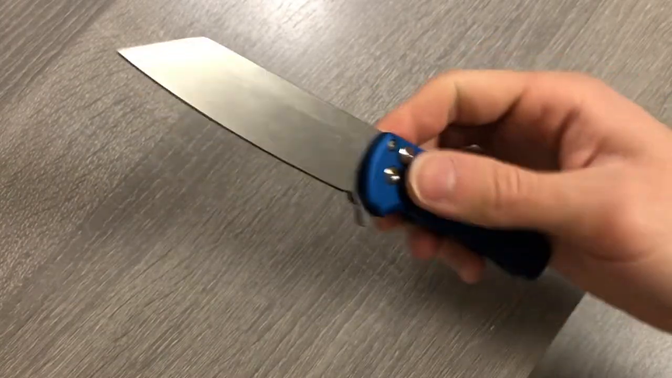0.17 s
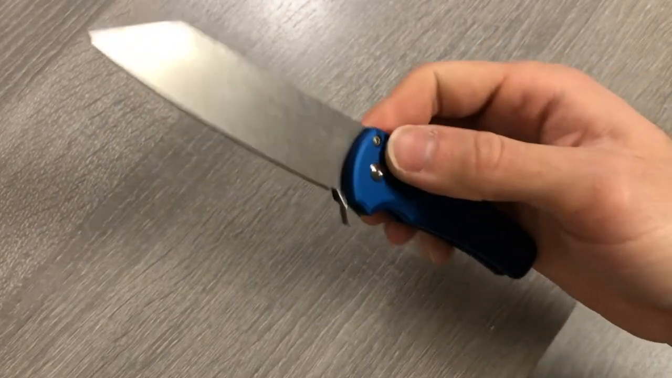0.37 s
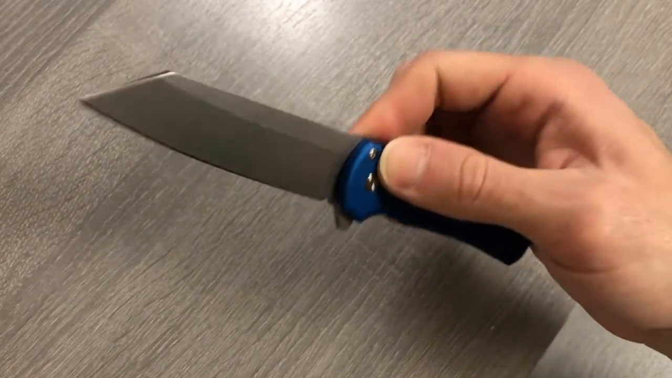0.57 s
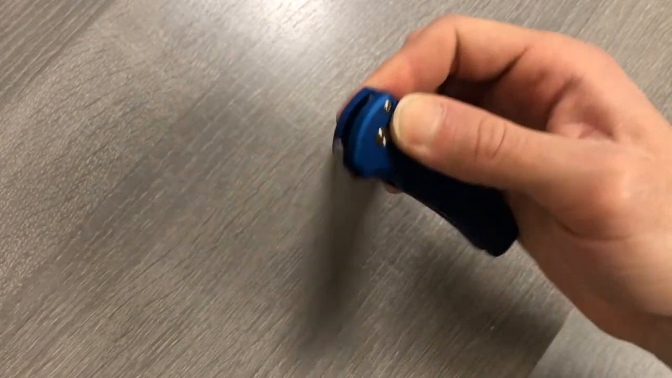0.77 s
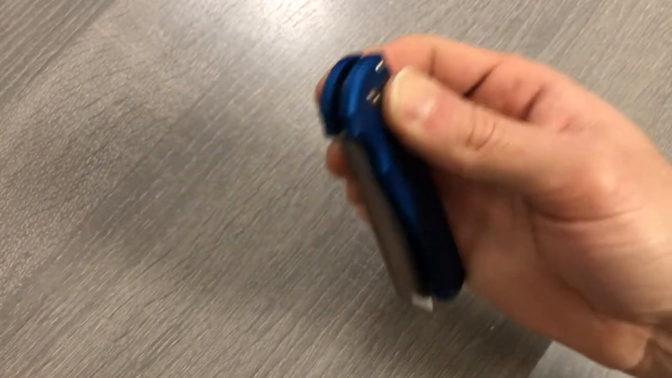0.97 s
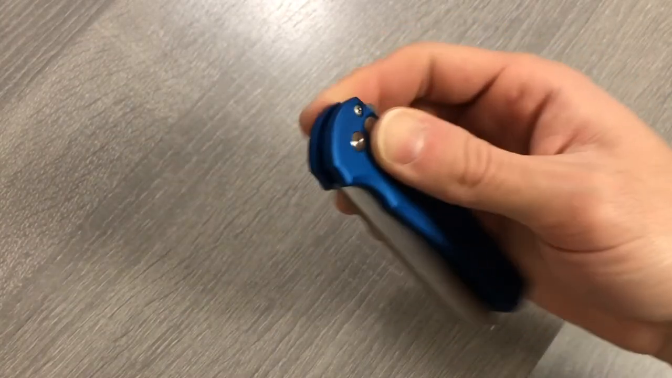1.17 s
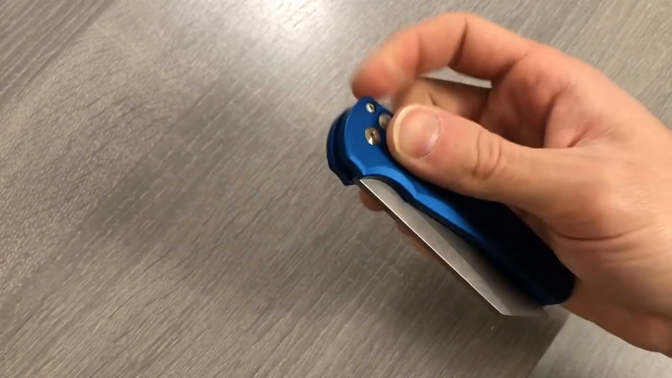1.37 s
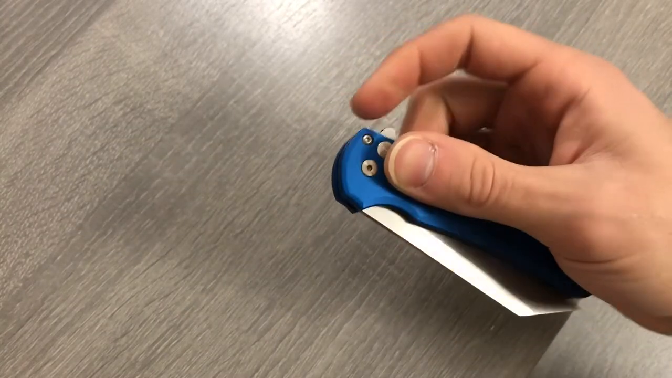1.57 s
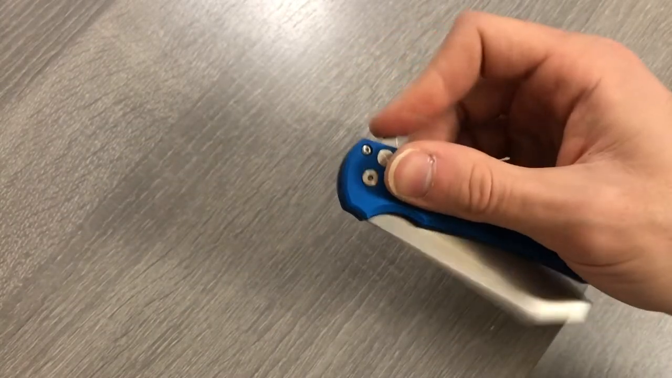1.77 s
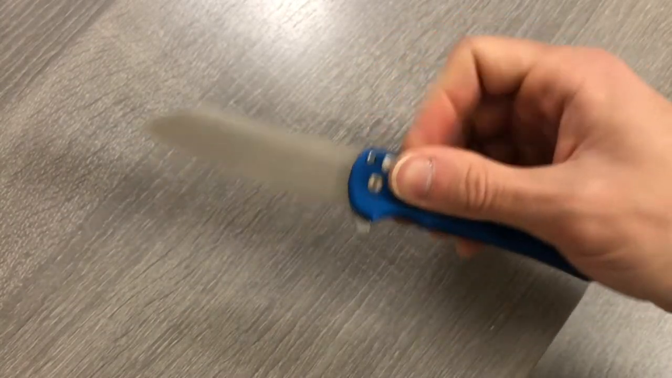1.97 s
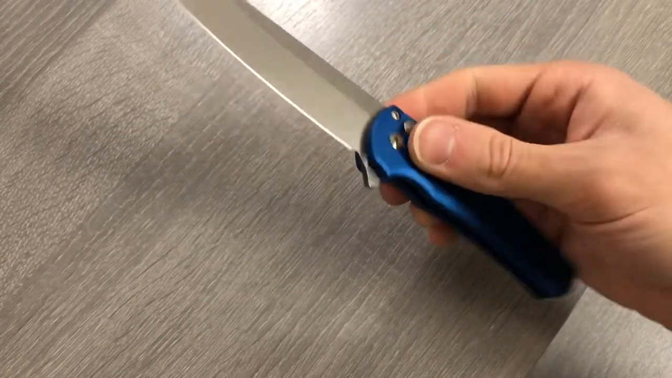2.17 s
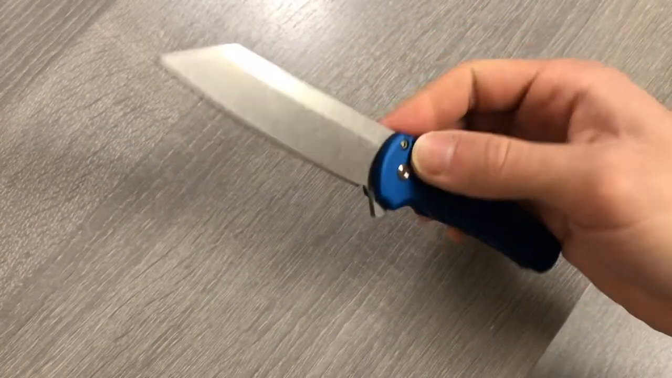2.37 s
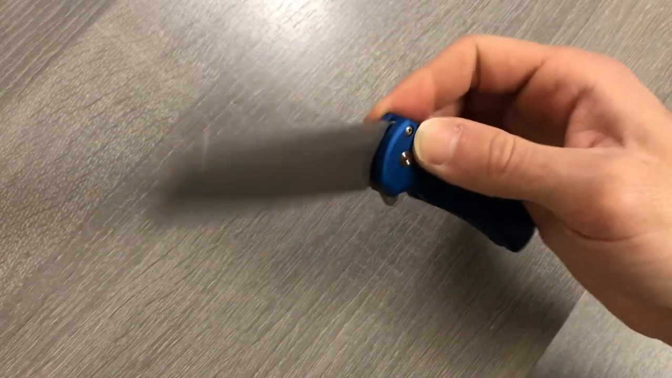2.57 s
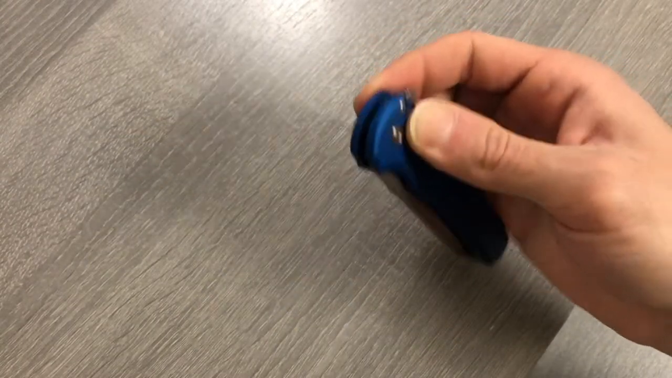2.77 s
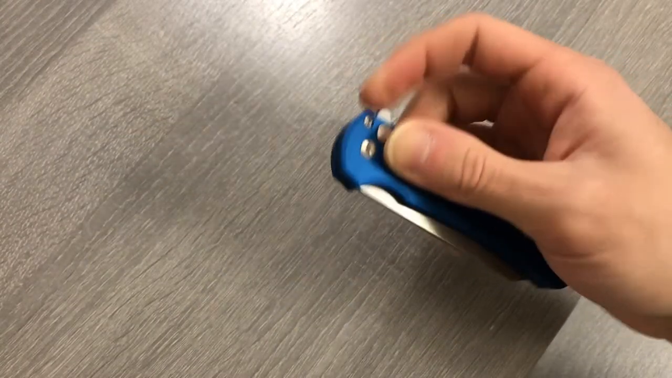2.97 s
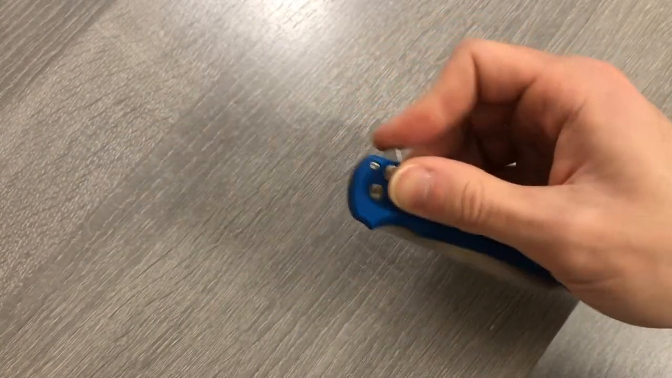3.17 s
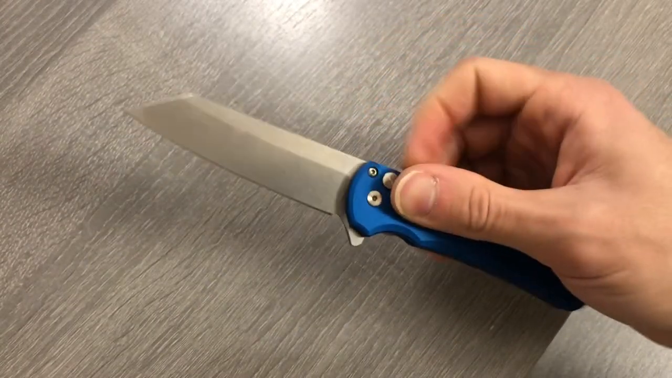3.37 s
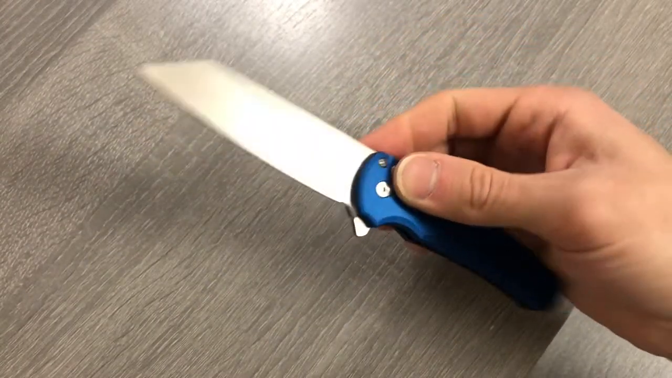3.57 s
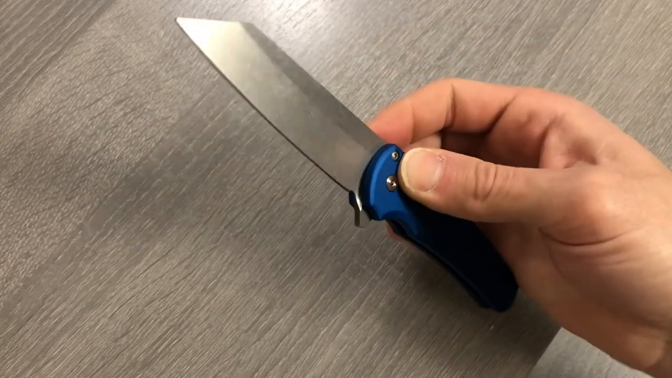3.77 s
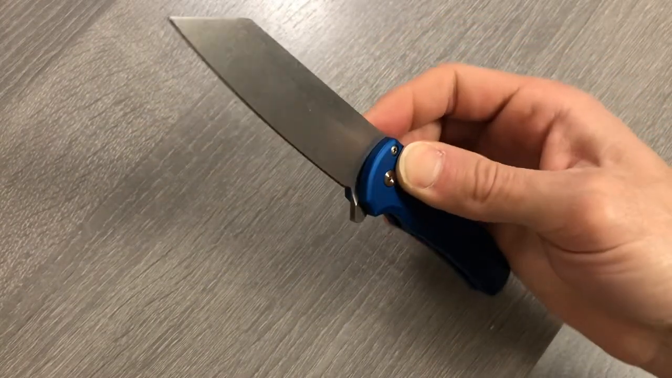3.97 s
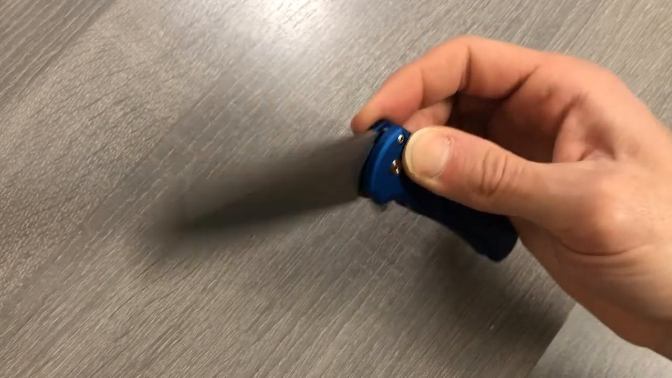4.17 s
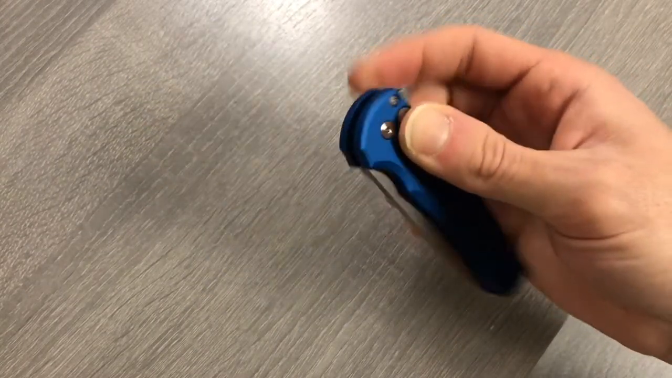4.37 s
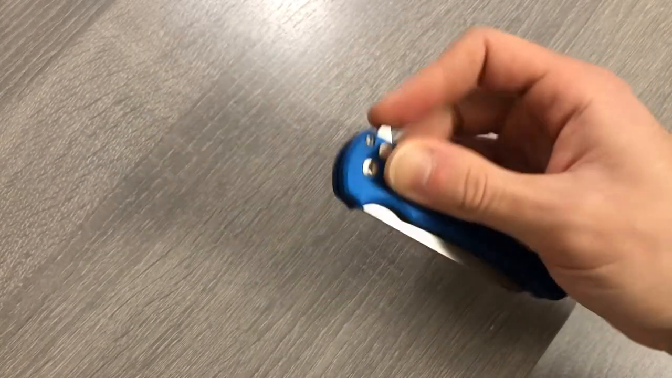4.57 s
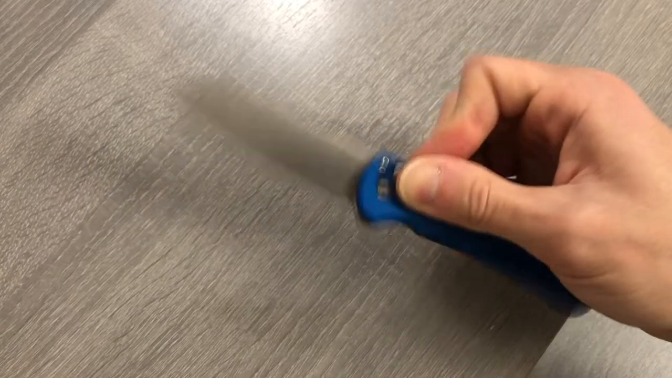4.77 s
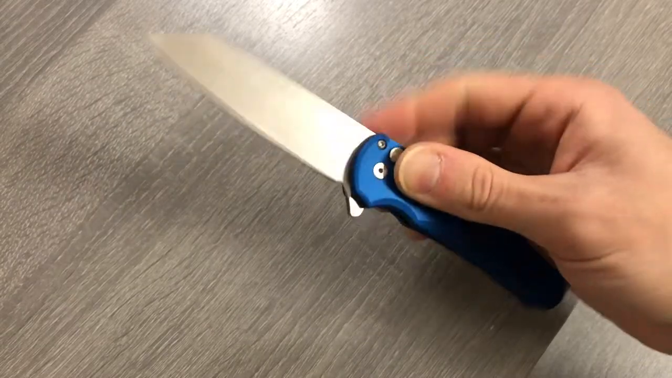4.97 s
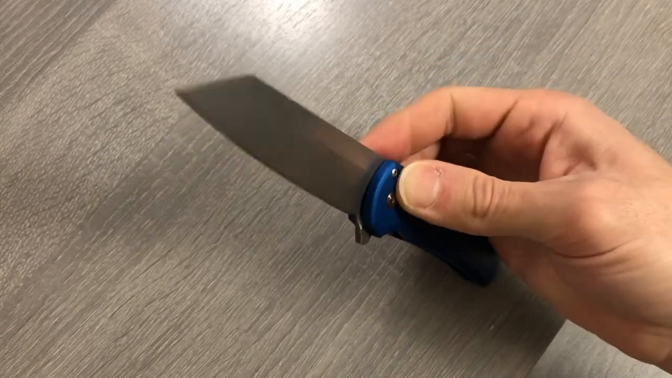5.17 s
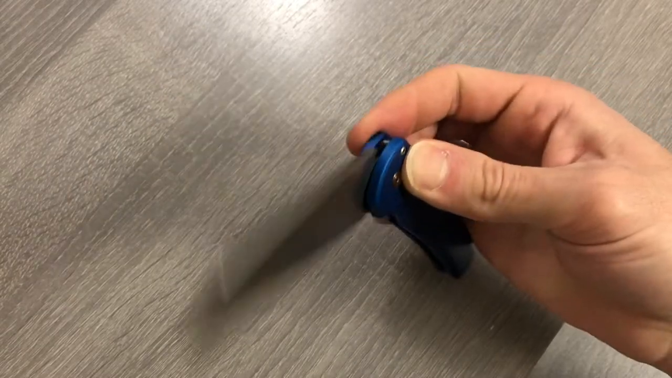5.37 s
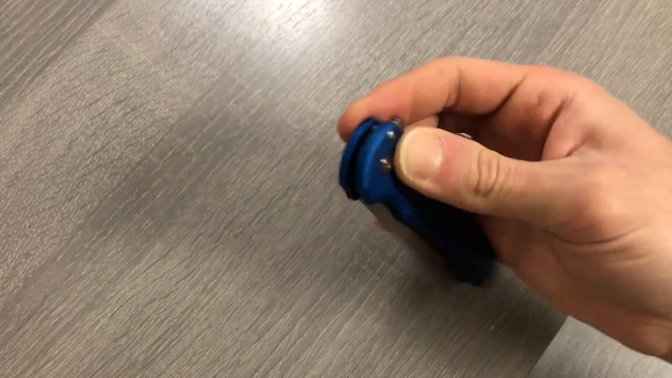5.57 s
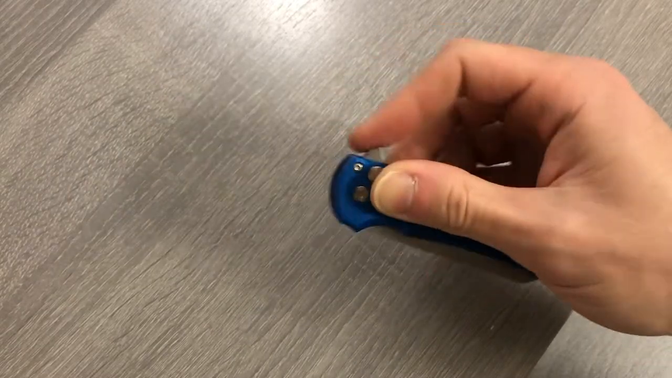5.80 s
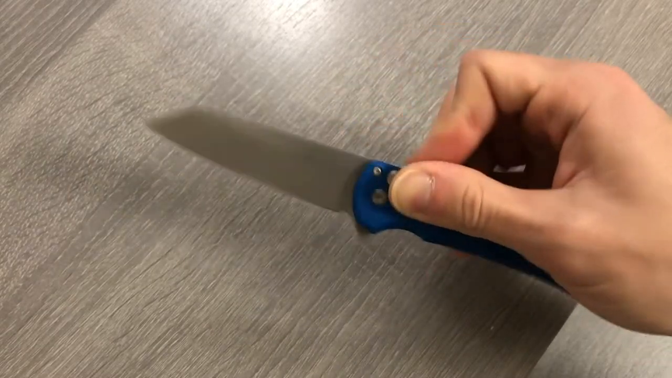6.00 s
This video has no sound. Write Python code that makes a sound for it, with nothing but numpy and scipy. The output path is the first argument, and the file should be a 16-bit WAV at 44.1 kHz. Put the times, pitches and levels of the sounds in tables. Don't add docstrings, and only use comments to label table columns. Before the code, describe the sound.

A close phone microphone in a small, quiet, hard-surfaced room, with low machinery hum, duct rumble and faint hiss throughout. At first only soft finger rubbing on a handle and a barely audible tick. At 0.54 s a small button click frees the blade, and at 0.82 s it clacks shut, bright and ringing. Light tab clicks at 1.77 and 1.81 lead to a sharp, dry lock-open crack at 1.91. A very faint release at 2.4, a brief rub, then a double shutting clack at 2.74. Tab click at 3.19, very loud open snap with rebound at 3.26, slightly overloaded. Soft button click at 3.7, dense shutting clatter at 4.31, tab clicks at 4.7, another hard snap at 4.76. Faint release at 5.15, shutting clacks at 5.5 and 5.58, tab clicks near 5.88, final ringing open snap with rebounds at 5.94.

```python
import sys
import numpy as np
from scipy import signal
from scipy.fft import rfft, irfft
from scipy.io import wavfile
from scipy.ndimage import uniform_filter1d

SR = 44100
rng = np.random.default_rng(int(sys.argv[2]) if len(sys.argv) > 2 else 0)


def pcm_store(signal):
    levels = np.round(np.clip(np.atleast_2d(signal), -1, 1) * 32767)
    wavfile.write(sys.argv[1], SR, levels.astype(np.int16).T)


def ratio_of_db(decibels):
    return 10 ** (np.asarray(decibels, float) / 20)


N = 266143

# start in seconds, peak in dB, brightness in dB per octave, crack in dB, ring length factor.
LOCK_BLOWS = [
    (1.9045, -32, 2.5, -2, 1.7),
    (1.9108, -6.5, -2, 5.5, 0.99),
    (3.2648, 3.5, 1, -5.5, 2.3),
    (3.2775, -13, 3.5, -5, 0.54),
    (4.762, 3, -1.3, -3.5, 1.4),
    (4.7755, -10, 8, -3, 0.86),
    (5.9435, 0, 0, -3, 2.1),
    (5.9566, -11.5, 1, -1.5, .99),
    (5.9634, -14.5, 5.5, -3, .8),
]
SHUT_BLOWS = [(.8243, -3, 6, -7, 2.4), (2.7432, -5.5, 2.5, -13.5, 3.3), (2.7653, -16.5, 4.5, -3.5, 1.3),
              (4.3083, -5.5, 1.5, -13.5, 0.74), (4.3105, -3.5, 2, -9, 0.41), (4.312, -3.5, 2.5, -2.5, 1.4),
              (4.3203, -13.5, 5, -0.5, 1.5), (5.4987, -7, 4, -7.5, 2.5), (5.507, -19.5, -2.5, -2.5, 1.07),
              (5.5787, -11, 2.5, -5, 0.69), (5.587, -17, 2, -3.5, 0.52)]
BUTTON_BLOWS = [(.5393, -18, 3.5, -3, 2.2), (2.4175, -34, -7, -1.5, 1.7), (3.6958, -23.5, -1.5, -10, 1.8),
                (5.1548, -33.5, -8.5, -9, 1.5)]
PULL_BLOWS = [(1.7694, -29.5, -1.5, -2, 1), (3.1924, -16, 0.5, -9.5, 1.4), (4.2717, -22.5, 8.5, -2.5, 0.27),
              (4.6864, -15.5, 1, -1.5, 1.4), (5.8694, -15, 7.5, -6, .94)]
DETENT_BLOWS = [(1.8105, -23.5, -1.5, 4, 2.1), (3.2119, -23, -1, -1.5, 2.5), (3.2139, -23, -2, 0, 0.89),
                (4.708, -27, 0, -4.5, 3.2), (5.8897, -24, -2.5, 2.5, 2.2)]
TICK_BLOWS = [(.3464, -60, 3, 8.5, 1.1), (1.0414, -65, -1.5, 5.5, 1.1), (1.1457, -64, 1.5, .1, 1.2),
              (2.152, -62, -2, 3.5, 1.1), (2.6259, -56.5, 7, -10, 1.9), (3.8901, -57, -12, 1, 1.17),
              (3.9524, -66, 3, .5, 1.1), (4.0065, -56.5, 3.5, 2, 0.8), (4.1324, -55, -14, 8.5, .79)]
# start in seconds, peak in dB, frequency in Hz, T60 in seconds.
PALM_KNOCKS = [(0.537, -39.5, 915, 0.012), (0.824, -52, 600, .02), (1.911, -22, 1446, 0.0088),
               (1.909, -28.5, 810, 0.017), (2.415, -50.5, 1256, 0.016), (2.744, -36, 654, 0.0081),
               (3.263, -24, 1077, 0.026), (3.263, -26.5, 580, 0.028), (3.263, -38, 300, .04),
               (3.695, -43, 1290, .015), (4.308, -45.5, 1517, .01), (4.762, -19.5, 1095, 0.018),
               (4.762, -35, 674, 0.018), (4.76, -33.5, 260.2, .04), (5.153, -38, 1340, 0.0055),
               (5.497, -53, 810, 0.01), (5.943, -15.5, 920, .016), (5.941, -17.5, 1143, 0.012)]
# start in seconds, level in dB.
LOCK_FLEXES = [(1.907, -17.5), (3.267, -11.5), (4.763, -10.5), (5.942, -10)]

# frequency in Hz, width in Hz, level in dB.
BENDING_MODES = [(1800, 97, -2.5), (2800, 60, -18), (3800, 50, -13.5), (4630, 70, -9), (9250, 50, -5.5)]
OPEN_MODES = [(2770, 130, -17), (3930, 120, -33), (4440, 270, -16.5), (4934, 59, -15.5), (5890, 300, -15),
              (6054, 160, -19), (7220, 310, -4.5), (8307, 150, 0.5), (9210, 33, -3), (9700, 50, -11),
              (11250, 140, 2), (12023, 38, -5.5), (12940, 250, -8), (14785, 80, -10)]
FOLDED_MODES = [(3150, 200, -19.5), (3830, 86, -32.5), (5430, 250, -15), (6550, 250, -9.5), (7170, 360, -6),
                (7530, 180, -12), (8310, 180, -8), (7960, 330, -3.5), (8050, 160, -12.5), (9460, 420, -10),
                (10050, 250, -12.5), (10900, 80, -8.5), (12840, 180, -9.5), (14180, 300, -20.5)]
UNLOCKED_MODES = [(2710, 188, -23), (5616, 250, -21.5), (7040, 170, -17), (7540, 180, -9),
                  (8530, 100, -6.5), (9980, 70, -17.5), (11000, 88, 1), (11870, 420, -4), (13200, 200, -7),
                  (14600, 180, -7.5), (15100, 97, -9.5)]
HELD_MODES = [(2940, 310, -17.5), (4800, 90, -16), (5170, 590, -13.5), (6900, 300, -5.5), (7900, 170, -6.5),
              (8000, 110, -9), (9510, 250, -12), (11200, 270, -13), (11900, 160, -1.5), (13800, 140, -5),
              (15000, 350, -10.5), (14200, 350, -16)]
LOOSE_MODES = [(4350, 92, -20), (5810, 190, -5.5), (6280, 59, -3), (8000, 57, 1.5), (9150, 200, -40),
               (12200, 300, -16), (13130, 180, -24), (15130, 300, -10.5)]
SWINGING_MODES = [(2600, 250, -22), (3890, 60, -9), (4260, 120, -13), (4720, 65, -2), (5760, 250, -12.5),
                  (6660, 70, -3), (7000, 190, 0), (8230, 170, 2.5), (8850, 100, -11), (9160, 40, -1.5),
                  (9900, 100, -11), (10600, 150, -10), (12700, 200, -3.5), (14100, 300, -17)]

# frequency in Hz, level in dB, T60 in seconds.
FREE_LINES = [(3900, -3, .22), (4725, -5, .2), (6810, -6, .38), (8215, -11, .5), (9260, 0, .28),
              (11010, -3, .33), (12000, -11, .3)]
CLAMPED_LINES = [(2765, -9, .36), (3800, -6, .33), (4580, -4, .27), (7340, -8, .22), (9250, 0, .27),
                 (11280, 0, .2), (12200, -5, .18)]

# Ring decay toward the walls before the hand shades it, in seconds.
WALL_RING_S = [.0013, .0012, .0015, .0015, .006, .006]
# rattle decay in seconds, wall crack in dB, focus of its colour (factor).
RATTLES = [(0.004, 0, 0.61), (0.0034, 4.5, 1.1), (0.0048, -5.5, .8), (0.0027, -1, 0.63), (.003, -3, 0.71),
           (.0027, -2, 1.4)]
# level relative to the peak in dB, length factor.
SONG_LEVELS = [(-37, .85), (-54, .6), (-36, 1.), (-36, .4), (-22, .45), (-24, .6)]

# frequency in Hz, level in dB.
CRACK_COLOUR = [(300, -66.5), (1000, -45.5), (3000, -18.5), (5000, -10), (8000, 6), (11000, -3.5),
                (14500, -9), (16500, -31)]

# peak time in seconds, peak in dB, rise in seconds,
# fall in seconds, share that rings the blade (0-1).
FINGER_SHIFTS = [(.045, -62.5, 0.21, 0.04, 0.43), (.115, -61, 0.046, 0.031, 0.88),
                 (.18, -67.5, .04, .05, .85), (.35, -66.5, .04, .03, 0.7)]
BLADE_SWINGS = [(.795, -68.5, .25, 0.027, .6), (2.64, -72.5, .015, 0.2, 1),
                (2.736, -53, 0.0088, 0.011, 0.57), (3.575, -56.5, .035, .045, 0.1),
                (4.15, -78, .015, 0.16, 1), (4.264, -57, 0.022, 0.004, .7), (5.035, -68.5, .03, 0.086, .8),
                (5.45, -77.5, .15, .04, 0.85), (5.476, -63.5, 0.026, 0.019, .3),
                (5.495, -52.5, 0.0064, 0.0033, .5), (4.68, -61.5, 0.017, .006, 0.4),
                (5.862, -62, .02, .006, 0.66), (3.186, -59.5, 0.012, 0.0054, 0.7)]
# centre in Hz, spread in octaves.
SKIN_HISS = [(9800, 1), (10000, .42)]

# frequency in Hz, T60 in seconds.
ROOM_DECAY = [(1000, .12), (2600, .27), (4500, .25), (6000, .22), (8000, .22), (11000, .19), (14500, .15)]
# delay in seconds, level in dB.
EARLY_ECHOES = [
    (.0012, -15.5),
    (.0065, -25),
    (.0135, -22),
    (.027, -27),
]

# frequency in Hz, level in dB, pitch waver (fraction).
MACHINE_TONES = [(28.57, -41, 0.03), (42.3, -49, 0.042), (61, -52, 0.039), (59.8, -56.5, 0.06),
                 (119.9, -50.5, .002), (228, -73.5, 0.002), (262.6, -66.5, 0.015), (301.4, -67.5, 0.024),
                 (383, -81, 0.0016)]
# frequency in Hz, density in dB per Hz.
DUCT_AIR = [(8, 27), (35, 7), (95, -3.5), (170, -7.5), (280, -2.5), (450, -12.5), (535, -27), (800, -60.5)]
# frequency in Hz, density in dB per Hz.
FAN_HISS = [(300, -47), (535, -22), (665, -16.5), (1400, -26.5), (3000, -36.5), (6000, -43), (15600, -44.5),
            (16500, -60)]

WANDER_HZ, BUILD_S = 36, 0.00017
MODE_TILT, WALL_TILT = 0.6, 0.6
GRIP_DB, RATTLE_DB, FLUTTER_DB = 2, 5.0, 4.5
ROOM_DB, ROOM_BUILD_S, ECHO_SMEAR_S = -14, 0.0099, 0.0012
FLOOR_DB, CEILING, EDGE_HZ = -55.5, 1, 16000


def read(points, hz):
    f, value = np.transpose(points)
    return np.interp(np.log(hz + 1), np.log(f + 1), value)


def evened(x):
    return x / np.sqrt(np.mean(x ** 2) + 1e-20)


def add(mix, s, sound):
    part = mix[:, max(round(s * SR), 0):][:, :sound.shape[1]]
    part += sound[:, :part.shape[1]]


def coloured(x, points, tilt_db=0.0):
    hz = np.fft.rfftfreq(len(x), 1 / SR)
    gain_db = read(points, hz) + tilt_db * np.log2((hz + 100) / 8000)
    return irfft(rfft(x) * ratio_of_db(gain_db), len(x))


def slow(hz):
    t = np.arange(0, N + 32, 32) / SR
    wave = sum(np.sin(2 * np.pi * (f * t + rng.random())) for f in hz * np.geomspace(0.1, 1, 12))
    return evened(np.interp(np.arange(N) / SR, t, wave))


def clicks():
    out = np.zeros((2, N))
    states = [(LOCK_BLOWS, OPEN_MODES, CLAMPED_LINES), (SHUT_BLOWS, FOLDED_MODES, FREE_LINES),
              (BUTTON_BLOWS, UNLOCKED_MODES, FREE_LINES), (PULL_BLOWS, HELD_MODES, FREE_LINES),
              (DETENT_BLOWS, SWINGING_MODES, FREE_LINES), (TICK_BLOWS, LOOSE_MODES, FREE_LINES)]
    for state, carry_s, rattle, (song_db, longer) in zip(states, WALL_RING_S, RATTLES, SONG_LEVELS):
        rows, modes, lines = state
        chatter_s, wall_db, focus = rattle
        for row in rows:
            s, peak_db = row[:2]
            add(out, *blow(modes, chatter_s, carry_s, wall_db, focus, *row))
            add(out, *song(lines, s, peak_db + song_db, longer))
    for row in PALM_KNOCKS:
        add(out, *knock(*row))
    for row in LOCK_FLEXES:
        add(out, *flex(*row))
    return out


def blow(modes, chatter_s, carry_s, wall_db, focus, s, peak_db, tilt_db, crack_db, longer):
    t = np.arange(8192) / SR
    uneven_db = RATTLE_DB * rng.standard_normal(8192 // 16).repeat(16)
    rattle = rng.standard_normal(8192) * ratio_of_db(uneven_db)
    crack = coloured(rattle, CRACK_COLOUR, tilt_db)
    crack *= np.exp(-t / np.clip(chatter_s, 2e-4, 0.02)) * (1 - np.exp(-t / BUILD_S))
    crack *= ratio_of_db(crack_db) / np.linalg.norm(crack)
    ring = ringing(modes, tilt_db, longer)
    ring /= np.linalg.norm(ring)
    near = ring + crack
    loudest = np.sqrt(uniform_filter1d(near ** 2, 130).max())
    wall_colour = np.multiply(CRACK_COLOUR, [1, focus])
    snap = coloured(signal.unit_impulse(8192, 40), wall_colour, WALL_TILT * tilt_db) * np.exp(-t / 0.01)
    shaded = ring * np.exp(-t / carry_s) + ratio_of_db(crack_db + wall_db) * snap / np.linalg.norm(snap)
    shaded *= np.linalg.norm(near) / np.linalg.norm(shaded)
    return s - 0.0003, ratio_of_db(peak_db - 2.5) * np.array([near, shaded]) / loudest


def ringing(modes, tilt_db, longer):
    hz, width_hz, db = np.transpose(modes)[:, :, None]
    db = db + MODE_TILT * tilt_db * np.log2(hz / 8000) + GRIP_DB * rng.standard_normal(hz.shape)
    t = np.arange(8192) / SR
    fading = np.exp(-np.pi * width_hz / np.clip(longer, 0.2, 5) * t)
    steps = rng.standard_normal((len(hz), 8192 // 8))
    wander = np.cumsum(steps, 1).repeat(8, 1) * np.sqrt(WANDER_HZ / (SR // 8) / 2 / np.pi)
    turns = hz * t + rng.random(hz.shape) + wander
    ring = (ratio_of_db(db) * (width_hz + 30) * fading * np.sin(2 * np.pi * turns)).sum(0)
    return ring * (1 - np.exp(-t / BUILD_S))


def song(lines, s, level_db, longer):
    hz, db, t60 = np.transpose(lines)[:, :, None]
    t = np.arange(SR // 2) / SR
    flutter_hz = rng.uniform(18, 45, hz.shape)
    flutter = np.sin(2 * np.pi * (flutter_hz * t + rng.random(hz.shape)))
    db = level_db + db + GRIP_DB * rng.standard_normal(hz.shape)
    db = db - 60 * t / (t60 * longer) + FLUTTER_DB * flutter
    turns = hz * t + rng.random(hz.shape) + 0.12 * flutter
    return s, (ratio_of_db(db) * np.sin(2 * np.pi * turns)).sum(0) * np.array([[1], [0]])


def knock(s, peak_db, hz, t60):
    t = np.arange(2048) / SR
    pulse = np.sin(2 * np.pi * hz * t) * ratio_of_db(-60 * t / t60) * (1 - np.exp(-t / 0.00032))
    return s, ratio_of_db(peak_db) * pulse * np.array([[1], [0.3]])


def flex(s, level_db):
    t = np.arange(4096) / SR
    hz, width_hz, db = np.transpose(BENDING_MODES)[:, :, None]
    bend = ratio_of_db(level_db + db) * np.exp(-np.pi * width_hz * t) * np.sin(2 * np.pi * hz * t)
    return s, bend.sum(0) * np.array([[0], [1]])


def rubs():
    grain = rng.standard_normal(N) * ratio_of_db(2.8 * slow(73.0))
    out, t = np.zeros(N), np.arange(N) / SR
    kinds = [(FINGER_SHIFTS, LOOSE_MODES, 1.5), (BLADE_SWINGS, SWINGING_MODES, 2.5)]
    for (rows, modes, longer), (hz, octaves) in zip(kinds, SKIN_HISS):
        sing = evened(signal.fftconvolve(grain, ringing(modes, 0, longer))[:N])
        hump = [(hz * 2 ** (k * octaves), -6 * k ** 2) for k in range(-3, 4)]
        hiss = evened(coloured(grain, hump))
        for s, peak_db, rise_s, fall_s, share in rows:
            away = np.maximum((s - t) / rise_s, (t - s) / fall_s)
            swell = ratio_of_db(peak_db - 20 * np.minimum(away, 10) ** 1.3)
            share = np.clip(share, 0, 1)
            out += swell * (share * sing + np.sqrt(1 - share ** 2) * hiss)
    return out


def room(x):
    hz, t, z = signal.stft(rng.standard_normal(SR // 2), SR, nperseg=128)
    decay = ratio_of_db(-60 * t / read(ROOM_DECAY, hz)[:, None])
    tail = signal.istft(z * decay, SR, nperseg=128)[1]
    tail *= np.clip(np.arange(len(tail)) / SR / ROOM_BUILD_S, 0, 1)
    tail *= ratio_of_db(ROOM_DB) / np.linalg.norm(tail)
    for s, db in EARLY_ECHOES:
        echo = rng.standard_normal(256) * np.exp(-np.arange(256) / SR / ECHO_SMEAR_S)
        add(tail[None], s, ratio_of_db(db) * echo[None] / np.linalg.norm(echo))
    return signal.fftconvolve(x, tail)[:N]


def building():
    air = coloured(rng.standard_normal(N), DUCT_AIR) + coloured(rng.standard_normal(N), FAN_HISS)
    above = signal.sosfilt(signal.butter(4, 150, "high", fs=SR, output="sos"), air)
    out = ratio_of_db(FLOOR_DB) * air / np.std(above)
    for hz, db, waver in MACHINE_TONES:
        turns = np.cumsum(hz * (1 + waver * slow(4.0))) / SR
        out += np.sqrt(2) * ratio_of_db(db + 0.48 * slow(3.3)) * np.sin(2 * np.pi * turns)
    return out


def scene():
    near, walls = clicks() + rubs()
    return (near + room(walls) + building())[None]


def low_pass(x):
    return signal.sosfilt(signal.butter(12, 15740, fs=SR, output="sos"), x)


def record(dry):
    clipped = np.clip(dry, -CEILING, CEILING)
    edge = signal.firwin(191, EDGE_HZ, fs=SR)
    return low_pass(signal.oaconvolve(clipped, edge[None], "same"))


dry = scene()
out = record(dry)
pcm_store(out)
```